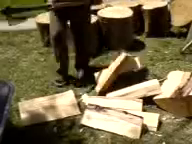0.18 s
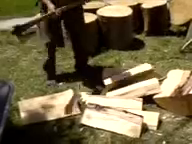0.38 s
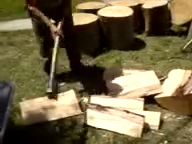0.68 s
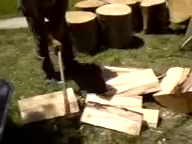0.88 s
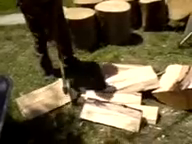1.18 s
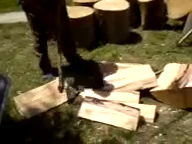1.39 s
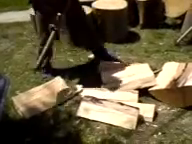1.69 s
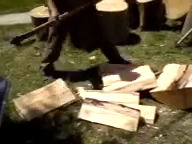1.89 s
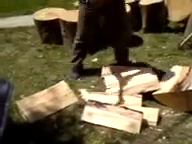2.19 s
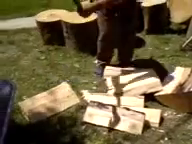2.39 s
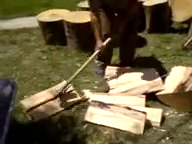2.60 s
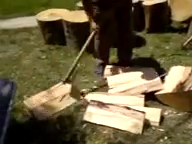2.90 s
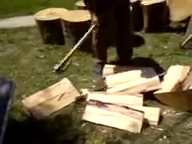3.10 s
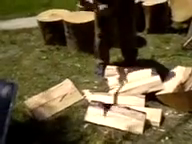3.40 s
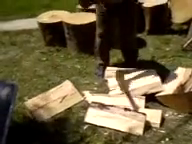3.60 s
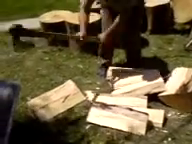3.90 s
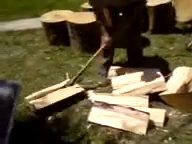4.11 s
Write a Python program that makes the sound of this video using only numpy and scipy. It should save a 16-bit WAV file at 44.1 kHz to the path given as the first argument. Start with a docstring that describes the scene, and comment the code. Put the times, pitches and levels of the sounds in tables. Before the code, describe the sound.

Split wood clatters onto a pile on grass, then an axe chops twice, the second blow splitting the log with a faint steel ring.

```python
"""Splitting firewood on a lawn

A billet topples and clatters against the pile, then the axe falls twice: a short chop, and a harder
one that tears the log open and leaves the steel head ringing. The grain gives way in quick jerks, each
a volley of snapping fibres. Boots and clothes rustle between blows, twigs snap, the yard echoes over
soft air and a thin whine, and a narrow-band microphone overloads on the chops."""
import sys
import numpy as np
from scipy import signal
from scipy.fft import rfft, irfft
from scipy.io import wavfile
from scipy.ndimage import uniform_filter1d

SR = 44100
rng = np.random.default_rng(int(sys.argv[2]) if len(sys.argv) > 2 else 0)


def wrap_up_sound(samples):
    """Save the sound to the file named by the first command line argument, as 16-bit audio."""
    columns = np.atleast_2d(samples).T
    # keep every value between -1 and 1, then stretch to whole-number steps
    tamed = np.clip(columns, -1, 1)
    steps = np.round(tamed * 32767).astype(np.int16)
    wavfile.write(sys.argv[1], SR, steps)


N = 189189
TIME = np.arange(N) / SR
HIT_TIME = TIME[:SR // 4]


def amp(db):
    """Decibels to gain."""
    return 10 ** (np.asarray(db) / 20)


def unit_rms(x):
    """Scales to rms 1."""
    return x / np.sqrt(np.mean(x ** 2) + 1e-20)


def decay(t, t60):
    """A fade that is 60 dB down after t60 seconds."""
    return np.exp(-np.log(1000) * t / t60)


def curve_at(points, hz):
    """Joins (Hz, value) points by straight lines over log frequency."""
    point_hz, value = np.transpose(points)
    return np.interp(np.log(hz + 1), np.log(point_hz + 1), value)


def add(mix, start, sound):
    """Mixes a sound in at a start time in seconds."""
    part = mix[max(round(start * SR), 0):][:len(sound)]
    part += sound[:len(part)]


def equalise(x, db_at):
    """Minimum-phase EQ whose gain in dB is db_at(Hz)."""
    hz = abs(np.fft.fftfreq(4096, 1 / SR))
    log_gain = np.log(amp(db_at(hz)))
    response = np.exp(np.conj(signal.hilbert(log_gain)))
    taps = np.fft.ifft(response).real[:2048]
    return signal.oaconvolve(x, taps)[:len(x)]


def wander(top_hz):
    """Random drift of rms 1, no faster than top_hz."""
    slow = np.fft.rfftfreq(N, 1 / SR) < top_hz
    return unit_rms(irfft(rfft(rng.standard_normal(N)) * slow, N))


def bell(hz, centre_hz, octaves):
    """EQ bell from 0 to 1: the spot that is struck favours one region of pitch."""
    return np.exp(-.5 * (np.log2((hz + 1) / centre_hz) / octaves) ** 2)


# The tone of the open air. Each row: frequency in Hz, gain in dB.
AIR_EQ = [(25, -26.5), (80, -10.5), (150, -10), (320, 1), (470, -3), (700, -4), (1270, -7), (1950, -3.5),
          (2300, -11), (3400, -19), (4400, -18)]


def air(level_db=-48.5):
    """A soft, drifting outdoor wash that sinks a little near the end."""
    wash = unit_rms(equalise(rng.standard_normal(N), lambda hz: curve_at(AIR_EQ, hz)))
    drift_db = wander(4.5) + np.interp(TIME, [2.9, 3.8], [1.5, -.3])
    return amp(level_db + drift_db) * wash


# The fader ride of the whine. Each row: time in seconds, level in dB.
WHINE_LEVELS = [(0, -75), (1.0, -67), (1.4, -42.5), (1.55, -54), (2.1, -52.5), (2.8, -55), (3.2, -53.5),
                (4.29, -77.5)]


def whine(centre_hz=2056, waver_hz=20):
    """A thin, wavering tone that comes and goes."""
    level_db = np.interp(TIME, *np.transpose(WHINE_LEVELS)) + 4.3 * wander(30)
    hz = centre_hz + waver_hz * wander(59.87)
    return amp(level_db) * np.sin(2 * np.pi * np.cumsum(hz) / SR)


# Echoes off trees and stacked logs. Each row: frequency in Hz, far tail's t60 in seconds, gain in dB.
ECHO_BANDS = [(80, 0.2, 9), (300, 0.33, 5), (800, 0.66, 3.5), (2012, 0.55, 3.5), (3396, 0.71, 0.5)]


def yard_echo(x, predelay_s=.027, far_db=-19.5, near_db=-19, near_t60=0.05):
    """Nearby log stacks answer in a short burst; a thin scatter from farther off lingers."""
    bands = np.array(ECHO_BANDS)
    t60_curve, eq_curve = bands[:, :2], bands[:, ::2]
    scatter = rng.choice([-1., 1.], SR) * (rng.random(SR) < 2000 / SR)
    hz, frame_s, spectra = signal.stft(scatter, SR, nperseg=256)
    spectra = spectra * decay(frame_s, curve_at(t60_curve, hz)[:, None])
    far = signal.istft(spectra, SR, nperseg=256)[1][:SR]
    near = rng.standard_normal(SR) * (rng.random(SR) < 900 / SR) * decay(TIME[:SR], near_t60)
    echoes = amp(far_db) * far / np.linalg.norm(far) + amp(near_db) * near / np.linalg.norm(near)
    echoes = equalise(echoes, lambda hz: curve_at(eq_curve, hz))
    out = np.zeros(N)
    add(out, predelay_s, signal.fftconvolve(x, echoes))
    return out


def gestures(rows, rise_s, curve, depth_db=21.5):
    """Envelope of movements: each climbs depth_db in rise_s and sinks as far in its own fade time."""
    power = np.zeros(N)
    for peak_s, db, fade_s in rows:
        from_peak = np.maximum((peak_s - TIME) / rise_s, (TIME - peak_s) / fade_s)
        power += amp(db - depth_db * np.minimum(abs(from_peak) ** curve, 10)) ** 2
    return np.sqrt(power)


def rustle(eq, slips_per_s, flutter_db, spread_db, ring_cycles, bands=30):
    """Tiny slips, each a click that rings briefly at its own pitch; flutter bunches them in clumps."""
    slips = np.zeros(N)
    for hz in np.linspace(200, 4400, bands) + rng.uniform(-50, 50, bands):
        place, size, side = rng.random((int(slips_per_s * N / SR / bands), 3)).T
        sizes = np.sign(side - .5) * amp(spread_db * np.minimum(-np.log(size), 4))  # a few stand out
        clicks = np.bincount((place * N).astype(int), sizes, N)
        pole = np.exp((2j * np.pi - 1 / ring_cycles) * hz / SR)
        ringing = signal.lfilter([pole.imag], [1, -2 * pole.real, abs(pole) ** 2], clicks + 1e-18)
        slips += np.sqrt(hz) * ringing
    slips *= amp(flutter_db * wander(45))
    return unit_rms(equalise(slips, lambda hz: curve_at(eq, hz)))


# The crunch of grass and chips. Each row: frequency in Hz, gain in dB.
GRASS_EQ = [(100, -14), (300, -34), (500, -18), (850, -7), (1260, -0.5), (1650, -4), (2480, 2.5),
            (3400, -8.5), (4400, -14.5)]
# Footsteps. Each row: moment of full weight in seconds, level in dB, fade in seconds.
FOOTSTEPS = [(.022, -39, 0.072), (.10, -35.5, 0.03), (.17, -36, 0.38), (.487, -38.5, 0.18),
             (.67, -31.5, 0.11), (2.225, -40, 0.046), (2.28, -36.5, .075), (2.455, -35.5, 0.076),
             (4.22, -46.5, 0.15)]


def boots():
    """Boots press crisply into grass and chips."""
    weight = gestures(FOOTSTEPS, rise_s=0.068, curve=1.17)
    return weight * rustle(GRASS_EQ, slips_per_s=4000, flutter_db=2.5, spread_db=4, ring_cycles=3.4)


# The tone of rubbing fabric. Each row: frequency in Hz, gain in dB.
CLOTH_EQ = [(100, -12.5), (260, -21), (550, -21), (1200, -16.5), (1800, -3), (2550, 4), (3400, -2.5),
            (4400, -15.5)]
# Body movements. Each row: fastest moment in seconds, level in dB, fade in seconds.
SWISHES = [(.28, -41, 0.11), (.97, -46, 0.14), (1.385, -40.5, 0.13), (1.77, -48.5, 0.29), (2.50, -32, 0.23),
           (2.66, -40, 0.09), (3.48, -48, 0.41)]


def clothes(rest_db=-61):
    """Sleeves and trousers swish as the axe is hauled about, and are never quite still."""
    motion = np.hypot(gestures(SWISHES, rise_s=0.18, curve=1.025), amp(rest_db))
    return motion * rustle(CLOTH_EQ, slips_per_s=7000, flutter_db=0, spread_db=2.5, ring_cycles=6.1)


def thud(db, hz, crest_s, steepness=1.15):
    """Wood rocks against soft ground: a low note that swells to a crest and is quickly smothered."""
    progress = (HIT_TIME / crest_s) ** steepness
    return amp(db) * progress * np.exp(1 - progress) * np.sin(2 * np.pi * hz * HIT_TIME)


# The tone of tearing grain. Each row: frequency in Hz, gain in dB.
GRAIN_EQ = [(30, -23), (70, -13.5), (170, -20), (260, 1), (500, 0), (700, 0), (1100, -5), (2000, -0.5),
            (2700, -1.5), (3500, -3), (4200, -9)]
# Narrow peaks and dips that colour the chop's crack.
# Each row: frequency in Hz, gain in dB before scaling by peak_share.
CRACK_COLOUR_PEAKS = [(590, 3), (850, 6.5), (1049, 13.5), (1255, 11), (1480, 1), (1610, 3.5), (1765, -1.5),
                      (1930, 11.5), (2080, 5), (2430, 4), (2700, 8.5), (3010, -15), (3270, 7.5),
                      (3476, -3.5)]


def crack(db, t60, bright_hz, first_snap, peak_share=0, lift_db=7, octaves=0.1):
    """One leading snap, then a dying volley of fibres; peak_share sets the colour peaks' strength."""
    def tone_db(hz, width_hz=45):
        peaks_db = sum(gain / (1 + ((hz - at) / width_hz) ** 2) for at, gain in CRACK_COLOUR_PEAKS)
        return curve_at(GRAIN_EQ, hz) + peak_share * peaks_db + lift_db * bell(hz, bright_hz, octaves)

    fibres = rng.random(len(HIT_TIME)) < 5000 / SR  # snaps per second
    polarity = np.sign(rng.standard_normal(len(HIT_TIME)))
    envelope = decay(HIT_TIME, t60)
    snaps = polarity * (fibres + first_snap * (HIT_TIME == 0)) * envelope
    sound = equalise(snaps, tone_db)
    return amp(db) * sound * np.linalg.norm(envelope) / (np.linalg.norm(sound) + 1e-12)


# Twigs and chips breaking. Each row: start in seconds, level in dB.
TWIG_SNAPS = [(.1080, -20), (0.799, -23), (1.4596, -30.5), (1.9153, -36), (2.8857, -37), (2.9328, -34.5)]


def twigs():
    """Twigs and chips snap with small, dry, bright cracks."""
    out = np.zeros(N)
    for start, db in TWIG_SNAPS:
        add(out, start, crack(db, t60=.028, bright_hz=2750, first_snap=.63, lift_db=13))
    return out


# The woody ring of a billet. Each row: frequency in Hz, relative level in dB, t60 in seconds.
BILLET_MODES = [(697, -3, 0.039), (1037, -7.5, 0.1), (1274, -4, 0.039), (1550, -13, 0.022),
                (1880, -14.5, 0.025), (2078, 2.5, 0.027), (2300, -6.5, 0.059), (2600, -4.5, 0.027),
                (2700, -1.5, 0.0028), (3254, -8, 0.047), (3273, -22, 0.014)]


def billet_ring(db, bright_hz, contact_s, lift_db, octaves, detune):
    """A billet's modes build up during the contact; no two pieces are tuned quite alike."""
    hz, mode_db, t60 = np.transpose(BILLET_MODES)[:, :, None]
    phase, offset = rng.uniform(-0.72, 1, (2, len(BILLET_MODES), 1))
    gains = amp(mode_db + lift_db * bell(hz, bright_hz, octaves))
    tones = np.sin(2 * np.pi * hz * (1 + detune * offset) * HIT_TIME + np.pi * phase)
    attack = 1 - np.exp(-(HIT_TIME / contact_s) ** 2)
    sound = (gains * decay(HIT_TIME, t60) * tones).sum(0) * attack
    peak = np.sqrt(2 * uniform_filter1d(sound ** 2, size=128).max())
    return amp(db) * sound / peak


# Short knocks of wood, some close after a landing. Each row: start in seconds, ring level in dB, bright spot in
# Hz, contact in seconds.
PILE_KNOCKS = [ (0.0837, -26.5, 2500, 0.00021), (0.1070, -22.5, 1370, 0.0036), (0.212, -29, 2600, .004),
               (0.2433, -25.5, 1280, 0.0011), (0.3584, -31.5, 1340, 0.00067), (0.6430, -25, 950, 0.0016),
               (0.713, -16.5, 2110, 0.0024), (0.7660, -21, 1040, 0.0011), (0.7710, -23.5, 3180, 0.00067),
               (0.7912, -26, 1020, 0.0039), (1.3250, -20.5, 1300, .005), (2.206, -24.5, 2610, 0.00078),
               (3.0350, -11, 2640, .001)]


def knocks():
    """Short wooden knocks: mostly ring, with a little scrape and thud."""
    out = np.zeros(N)
    for start, db, bright_hz, contact_s in PILE_KNOCKS:
        add(out, start, billet_ring(db, bright_hz, contact_s, lift_db=19, octaves=.17, detune=.015))
        add(out, start, crack(db - 14, .04, bright_hz, first_snap=.4))
        add(out, start, thud(db - 21, hz=323, crest_s=0.0043, steepness=2.15))
    return out


# Wood dropping on turf. Each row: start in seconds, thud level in dB, thud pitch in Hz,
# thud attack in seconds, clatter level in dB, bright spot in Hz.
TURF_LANDINGS = [ (0.592, -14, 338, 0.0053, -22.5, 1400), (0.6310, -8, 312, 0.0052, -15.5, 2210),
                 (0.7637, -11, 447, 0.0028, -17.5, 2320), (0.8245, -15.5, 300, 0.0092, -25, 2080),
                 (3.106, -23, 410, 0.0045, -29.5, 2800), (3.2630, -31.5, 290, 0.0061, -31, 1270)]


def landings(brush_lead_s=0.0045):
    """A billet brushes the grass, then lands with a clatter, a thud and a low push on the ground."""
    out = np.zeros(N)
    for start, thud_db, thud_hz, crest_s, clatter_db, bright_hz in TURF_LANDINGS:
        contact_s = 0.48 * crest_s  # a softer landing starts the ring more slowly
        ring = billet_ring(clatter_db - 3, bright_hz, contact_s, lift_db=13, octaves=.15, detune=.0067)
        add(out, start, ring)
        add(out, start, crack(clatter_db, 0.062, bright_hz, first_snap=0.45))
        add(out, start - brush_lead_s, crack(clatter_db - 9, 0.016, bright_hz, first_snap=.1))
        add(out, start, thud(thud_db, thud_hz, crest_s, steepness=2.05))
        add(out, start, thud(thud_db - 19.5, hz=101, crest_s=0.0023))
    return out


# The ring of the steel head. Each row: frequency in Hz, level in dB, t60 in seconds.
STEEL_MODES = [(1377, -39, 4.3), (1450, -54, 1.2)]


def axe_head(free_s=3.03, grip_s=3.56, grip_db_per_s=72):
    """Two close modes beat from the moment the head comes free until a firmer grip damps them."""
    out = np.zeros(N)
    for hz, db, t60 in STEEL_MODES:
        add(out, free_s, amp(db) * decay(TIME, t60) * np.sin(2 * np.pi * hz * TIME))
    return out * amp(-grip_db_per_s * np.maximum(TIME - grip_s, 0))


# The grain giving way: once in the first chop, twice in the second (the bite, then the tear).
# Each row: start in seconds, gap between jerks in seconds, strongest crack in dB, drop in dB per jerk
# away from it, crack t60 in seconds, bright spot in Hz, lift there in dB, thud level in dB,
# thud pitch in Hz, thud attack in seconds.
GRAIN_SPLITS = [ (1.2324, 0.0048, -5, 1.63, 0.029, 1500, 8, -6, 263.4, 0.0029),
                (2.9880, .0052, 2.5, 3, 0.054, 1080, 3.5, -6.5, 273.4, 0.0059),
                (3.0173, 0.0057, -4.5, 0.7, 0.035, 900, 0.5, -6, 443, 0.002)]


def chops(jerks=4, breaking_jerk=2, touch_lead_s=0.0058):
    """The edge touches the bark, then evenly spaced jerks build until the wood breaks."""
    out = np.zeros(N)
    for start, gap, crack_db, drop_db, t60, bright_hz, lift_db, thud_db, thud_hz, crest_s in GRAIN_SPLITS:
        touch = crack(crack_db - 20.5, t60=0.041, bright_hz=2030, first_snap=.7, peak_share=0.57)
        add(out, start - touch_lead_s, touch)
        add(out, start, thud(thud_db, thud_hz, crest_s))  # the log rocks
        add(out, start, thud(crack_db - 19.5, hz=70, crest_s=0.0053))  # and pushes the ground
        for jerk in range(jerks):
            jerk_s = start + jerk * gap
            spent_db = 3 * (jerk > breaking_jerk)
            db = crack_db - drop_db * abs(jerk - breaking_jerk) - spent_db
            tear = crack(db, t60, bright_hz, first_snap=2, peak_share=.66, lift_db=lift_db, octaves=.39)
            add(out, jerk_s, tear)
            if jerk:  # later jerks jolt the log less and less
                add(out, jerk_s, thud(thud_db - 8 * jerk, hz=410, crest_s=.0024))
    return out


def scene():
    """The wood with its echoes, the ringing steel, the woodcutter and the open air, in mono."""
    wood = chops() + landings() + knocks() + twigs()
    return (wood + yard_echo(wood) + axe_head() + boots() + clothes() + air() + whine())[None]


# The microphone's weak bass and steep treble edge. Each row: frequency in Hz, gain in dB.
MICROPHONE_EQ = [(20, -12), (70, -1), (165, -1.5), (235, 0), (3400, -0.5), (3700, -10.5), (4050, -15),
                 (4450, -30.5), (4900, -80.5)]


def record(dry, ceiling=.71, lowpass_hz=15900):
    """A narrow-band microphone, then hard overload, which alone makes the high treble of the chops."""
    narrow = equalise(dry[0], lambda hz: curve_at(MICROPHONE_EQ, hz))
    clipped = np.clip(narrow, -ceiling, ceiling)
    lowpass = signal.firwin(511, lowpass_hz, window=("kaiser", 9), fs=SR)
    return signal.oaconvolve(clipped, lowpass, "same")[None]


dry = scene()
out = record(dry)
wrap_up_sound(out)
```